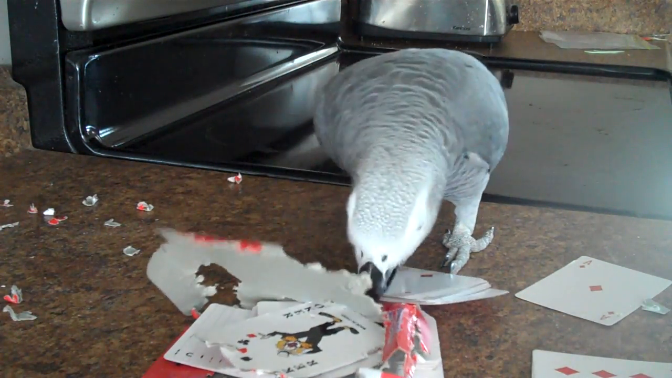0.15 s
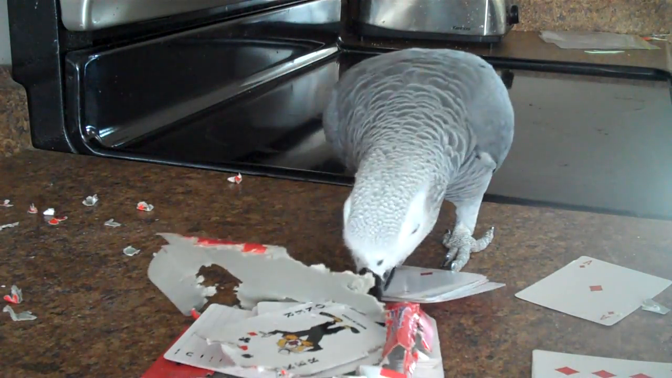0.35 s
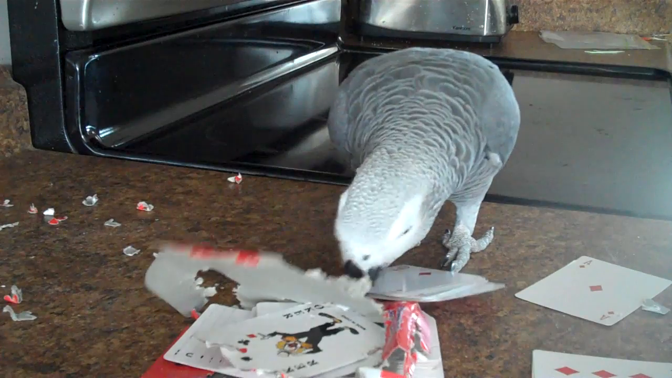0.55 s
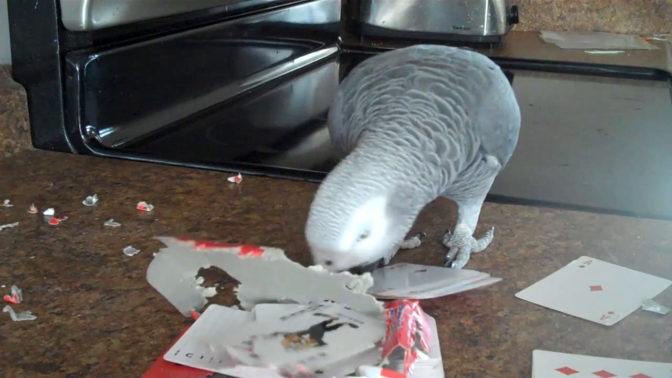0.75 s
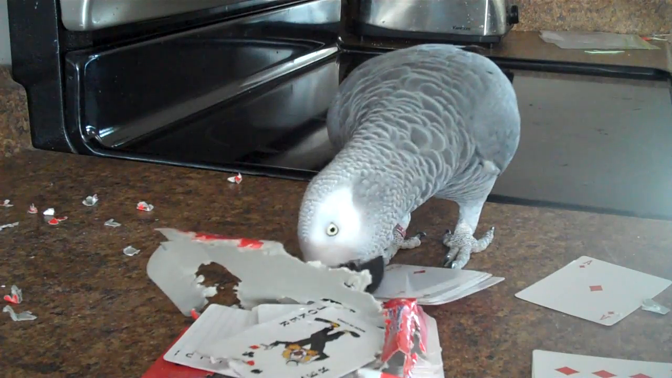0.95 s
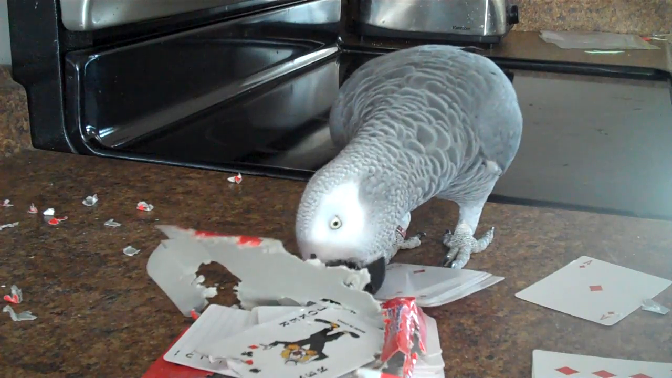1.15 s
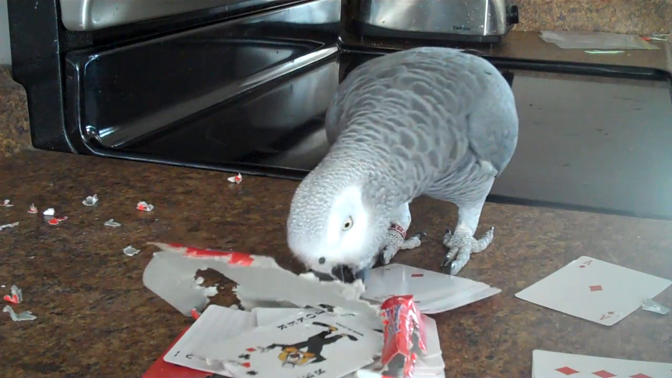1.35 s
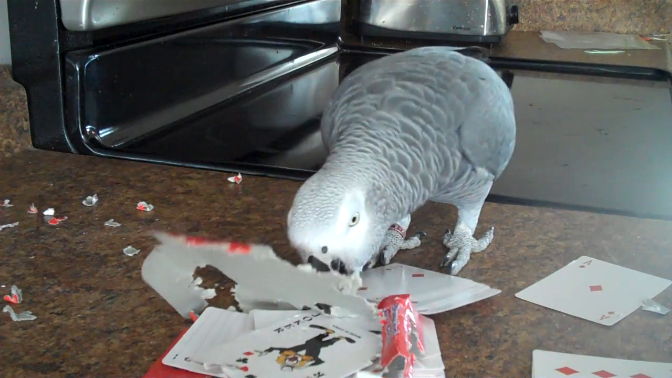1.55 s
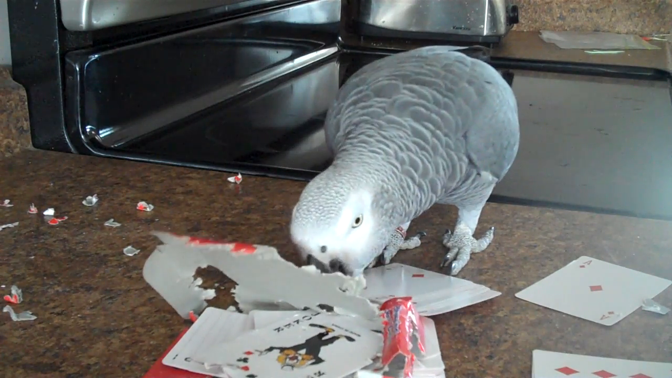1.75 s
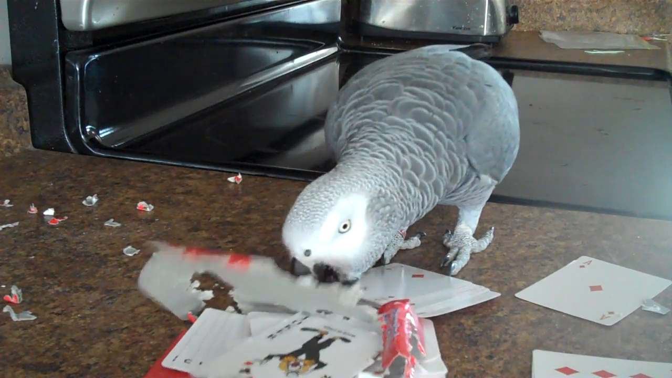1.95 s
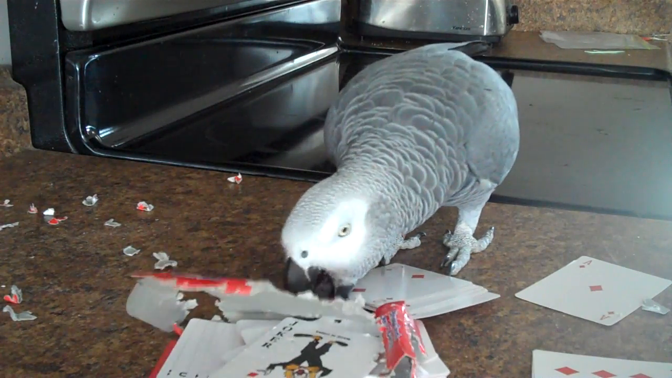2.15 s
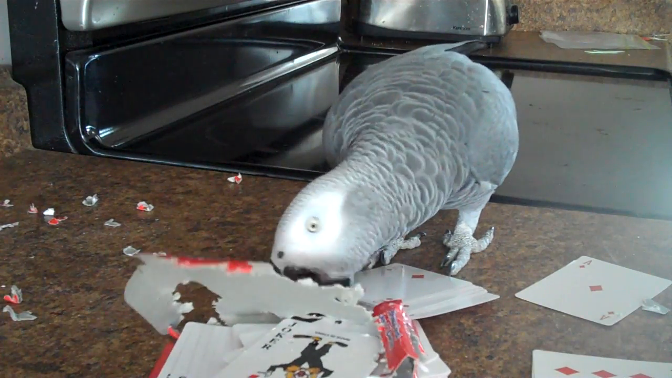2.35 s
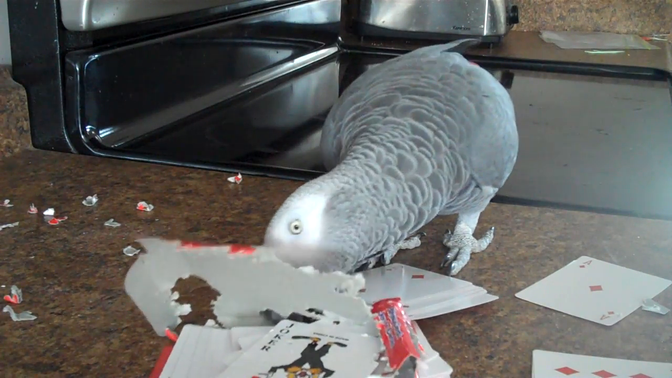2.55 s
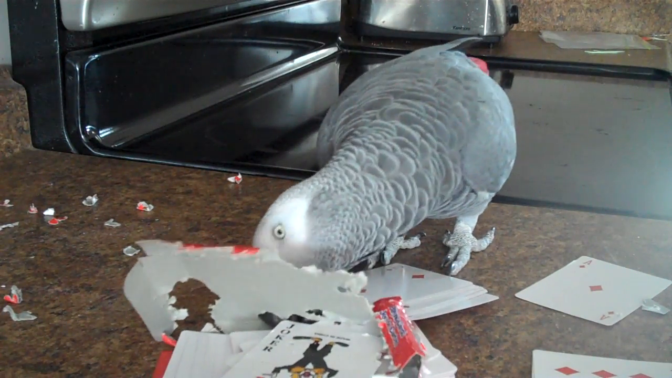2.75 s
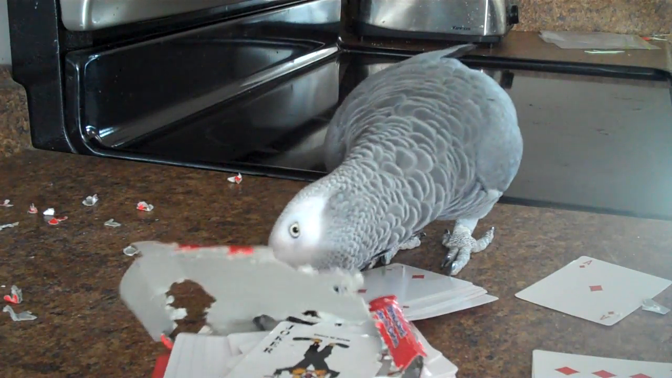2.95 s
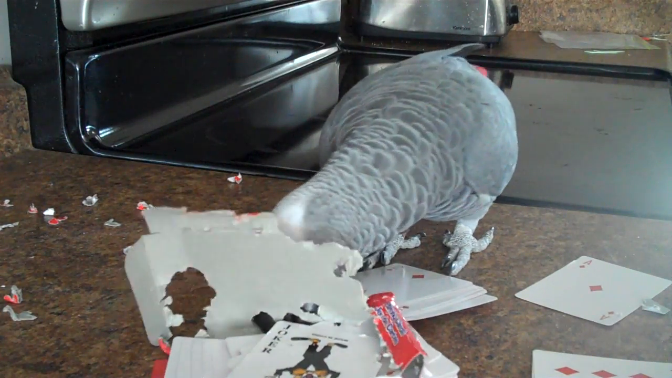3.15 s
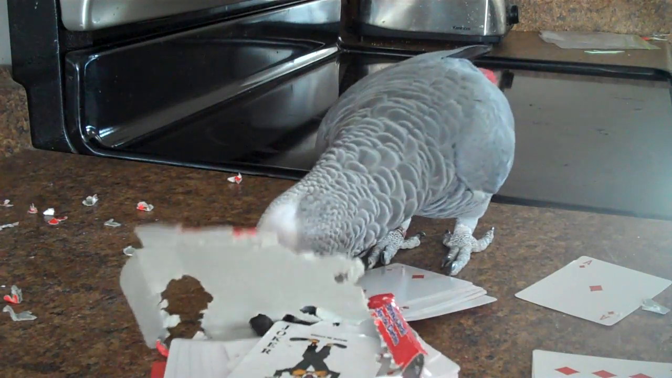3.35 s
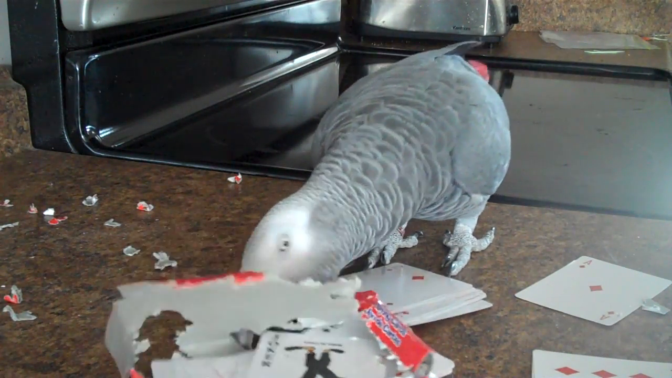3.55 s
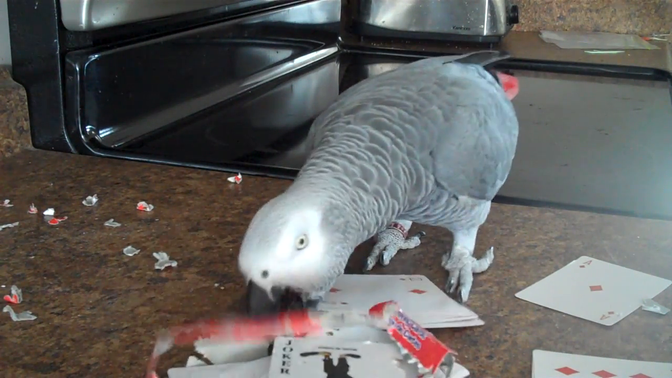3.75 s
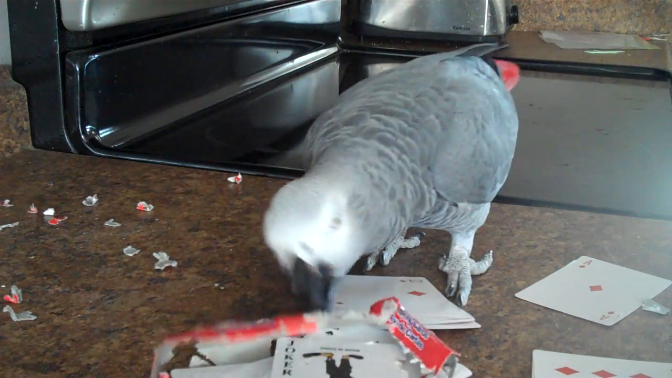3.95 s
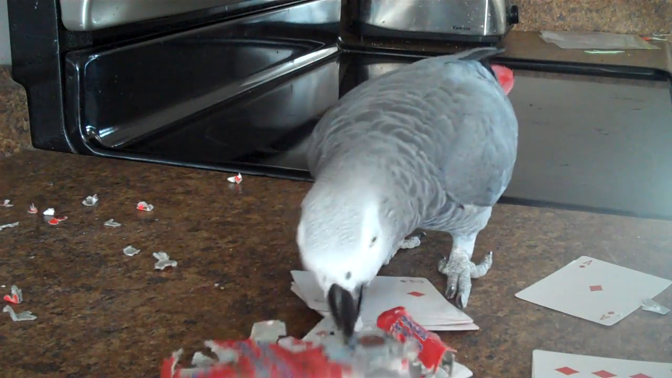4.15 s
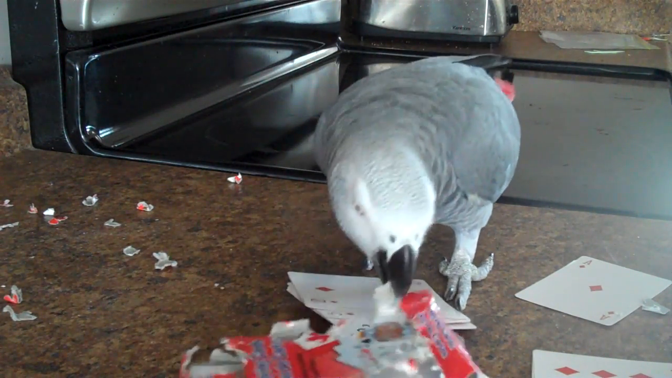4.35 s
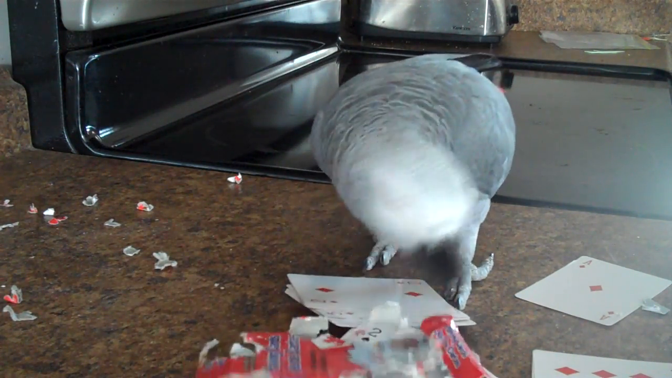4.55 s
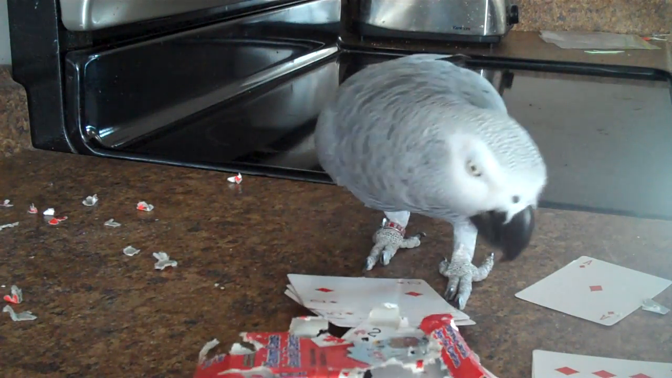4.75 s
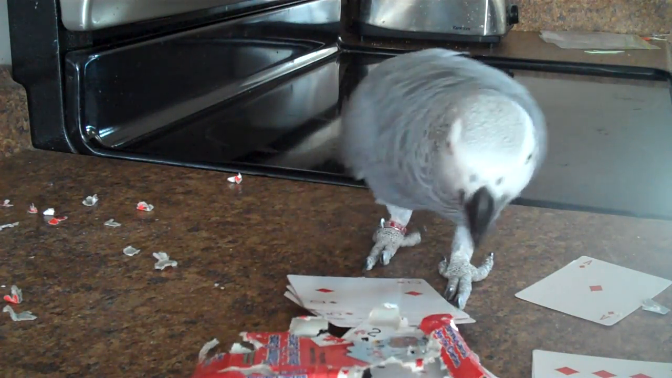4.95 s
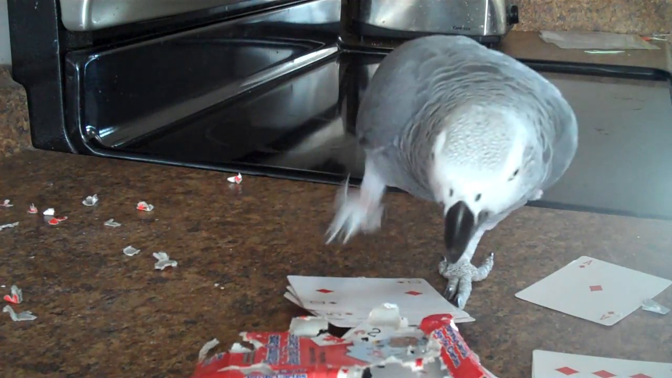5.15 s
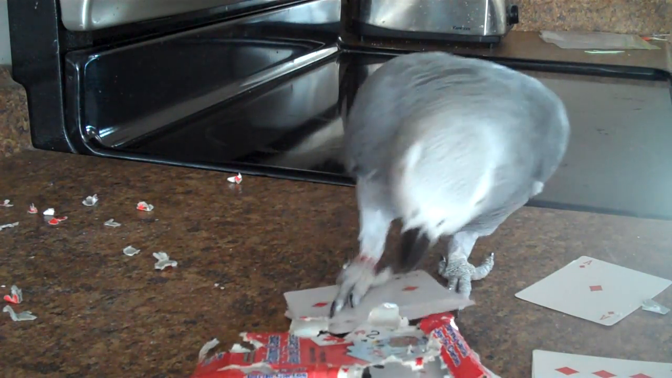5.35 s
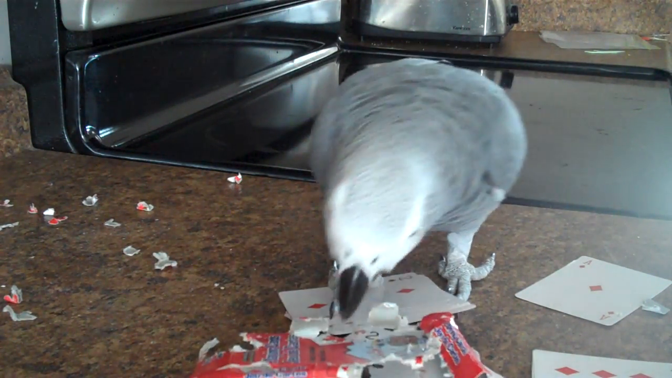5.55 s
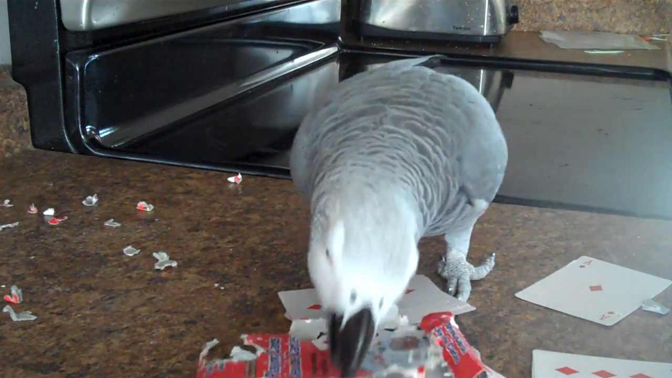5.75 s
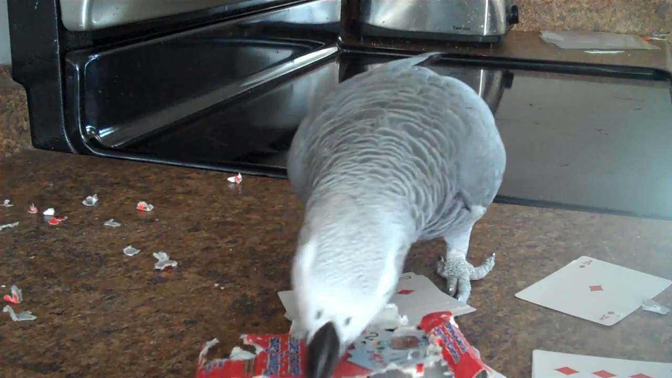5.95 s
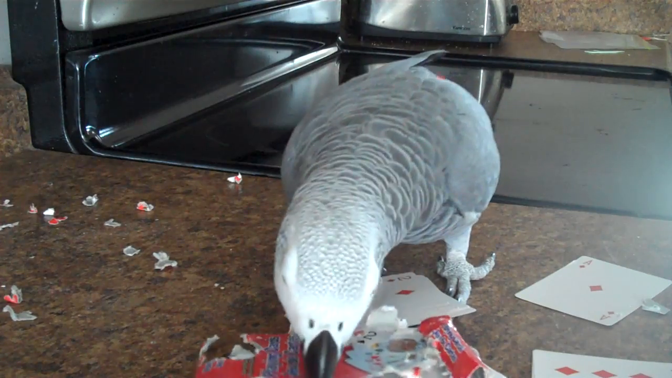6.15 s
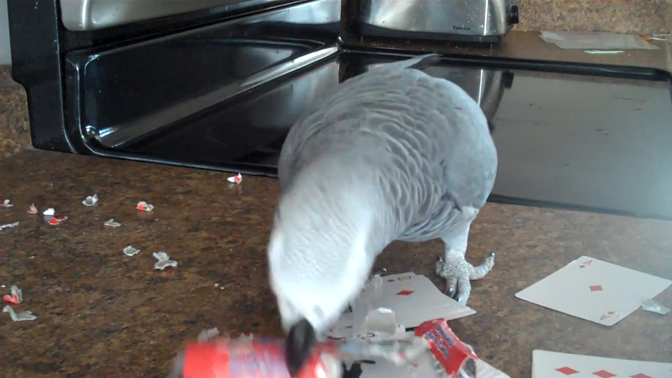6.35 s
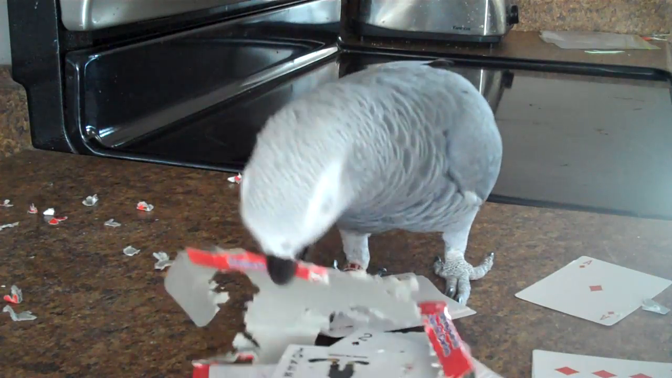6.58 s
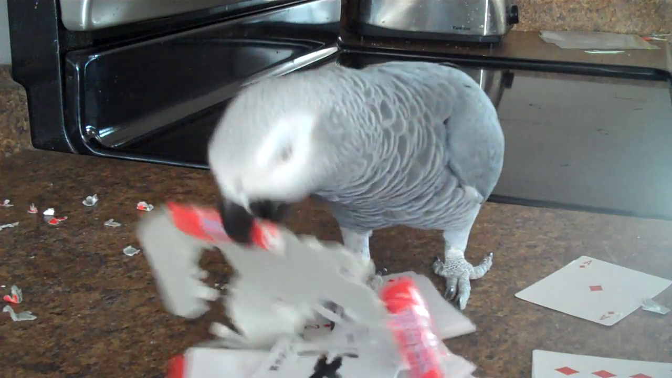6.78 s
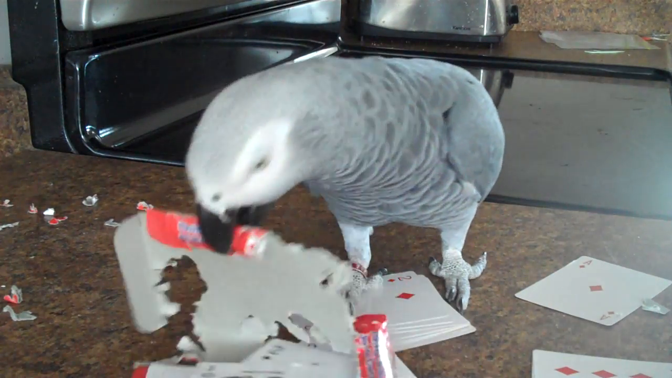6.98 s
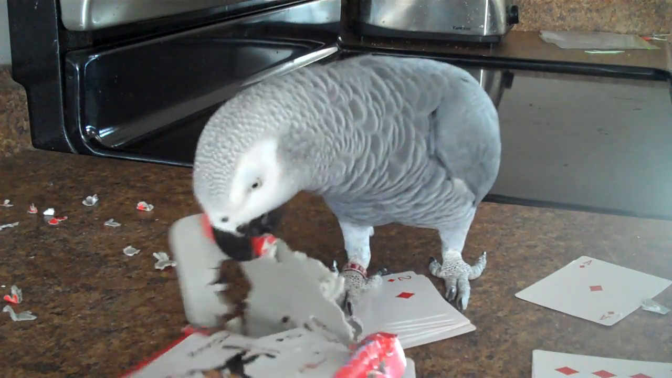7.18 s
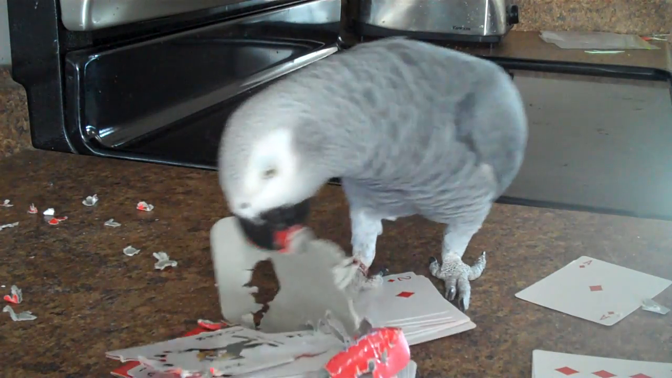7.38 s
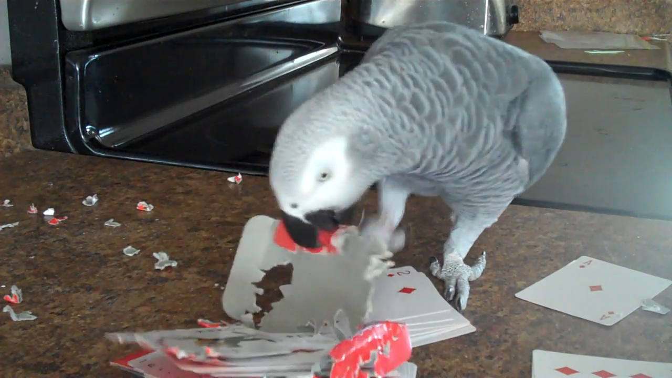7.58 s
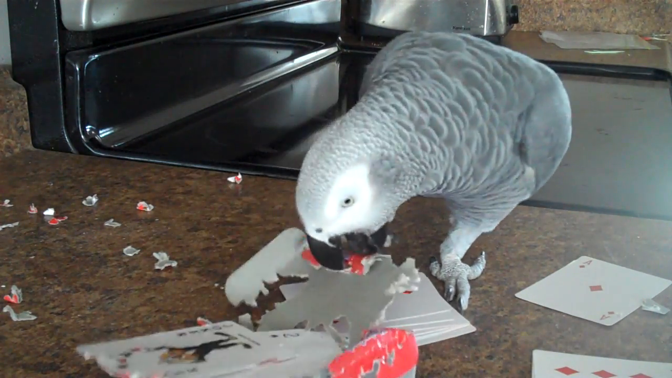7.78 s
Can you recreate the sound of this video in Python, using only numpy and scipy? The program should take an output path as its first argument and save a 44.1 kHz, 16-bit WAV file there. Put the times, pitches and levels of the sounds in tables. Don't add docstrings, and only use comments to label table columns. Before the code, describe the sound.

A low, faint refrigerator hum with airy hiss runs throughout a small kitchen with very little echo. Close to a small stereo microphone, a parrot works on a thin card box. From 0.1 to 1.3 seconds there are dry cracks, small knocks and light scraping, then a softer rustle. Around 2 to 3 seconds short bright rips and snaps come in separate bursts. From 3.4 to 4.6 the tearing grows denser, with a brief chirp at 3.6, a cluster of cracks, a hard pick at 4.2 and a thin wavering squeak near 4.4. It is nearly quiet around 4.7 to 5, then isolated ticks, crunches and a tiny rising squeak before 5.7. From 6.2 it builds again; a sharp pick at 6.65 precedes a loud flat slap at 6.8 with rattling and a short low puff. Crackling rips peak until 7.3, then thin into rustle and a few last crunches.

```python
import sys
import numpy as np
from scipy import signal
from scipy.fft import rfft, irfft, next_fast_len
from scipy.io import wavfile
from scipy.ndimage import uniform_filter1d

SR = 44100
rng = np.random.default_rng(int(sys.argv[2]) if len(sys.argv) > 2 else 0)


def natural_amplitude(level_db):
    exponent = np.asarray(level_db, float) / 20
    return 10 ** exponent


def wrap_up_sound(samples):
    columns = np.atleast_2d(samples).T
    tamed = np.clip(columns, -1, 1)
    steps = np.round(tamed * 32767).astype(np.int16)
    wavfile.write(sys.argv[1], SR, steps)


N = 344862


def evened(x):
    return x / np.sqrt(np.mean(x ** 2) + 1e-20)


def read(points, hz):
    f, value = np.transpose(points)
    return np.interp(np.log(hz + 1), np.log(f + 1), value)


def colour(points):
    half = np.log(natural_amplitude(np.maximum(read(points, np.fft.rfftfreq(2048, 1 / SR)), -80)))
    full = np.concatenate([half, half[-2:0:-1]])
    taps = np.fft.ifft(np.exp(np.conj(signal.hilbert(full)))).real[:1024]
    return taps / np.linalg.norm(taps)


def coloured(x, points):
    return signal.oaconvolve(x, colour(points)[None])[:, :x.shape[1]]


def resonate(x, hz, width):
    turn = np.exp(2j * np.pi * np.cumsum(hz * np.ones(x.shape[-1])) / SR)
    r = np.exp(-np.pi * width / SR)
    return 2 * (turn * signal.lfilter([1 - r], [1, -r], x / turn)).real


def add(mix, s, sound):
    part = mix[:, round(s * SR):][:, :sound.shape[1]]
    part += sound[:, :part.shape[1]]


def ports(streams, same, lean, lead):
    size = next_fast_len(N)
    hz = np.fft.rfftfreq(size, 1 / SR)
    first, second = rfft(streams, size)
    likeness = np.clip(read(same, hz), 0, 1)
    right_gain = natural_amplitude(-read(lean, hz))
    turn = np.exp(-1j * read(lead, hz))
    unlike = 1 - likeness ** 2
    middle = np.sqrt(abs(1 + right_gain * likeness * turn) ** 2 + right_gain ** 2 * unlike) / 2
    right = right_gain * (likeness * turn * first + np.sqrt(unlike) * second)
    return irfft(np.array([first, right]) / middle, size)[:, :N]


# frequency [Hz], level [dB per Hz].
ROOM_AIR = [(24, -20), (40, 0.5), (69, -8.5), (163, -8), (259, -3.5), (340, 0.5), (529, -9), (729, -7.5),
            (1640, -13.5), (4390, -20), (7540, -23), (9410, -23), (14300, -25)]
# frequency [Hz], level [dB], width of its wavering [Hz].
MOTOR_LINES = [(59.5, -72, 1.5), (119.9, -73, 2.5), (213, -78, 3), (238, -79, 3), (297, -77, 3),
               (318.1, -63, 2.2), (370, -77, 3), (397, -77, 3), (427.5, -73, 6.0)]
# frequency [Hz], likeness [0 to 1].
AIR_SAME = [(60, 0.24), (130, 0.22), (290, 0.99), (640, 0.48), (1400, 0.37), (3090, 0.051), (6790, 0.07),
            (14900, 0.02)]
# frequency [Hz], left-right difference [dB].
AIR_LEAN = [(60, 3.1), (180, 3.1), (550, 4.4), (1640, 5.1), (4950, 3.2), (14900, 1.1)]


def refrigerator():
    size = next_fast_len(N)
    hz = np.fft.rfftfreq(size, 1 / SR)
    response = natural_amplitude(read(ROOM_AIR, hz)) * np.minimum(hz / 70, 1) ** 2
    air = irfft(rfft(rng.standard_normal((2, size))) * response, size)
    out = natural_amplitude(-58) * evened(air[:, :N])
    t = np.arange(N) / SR
    for line_hz, db, width in MOTOR_LINES:
        waver = 0.05 * evened(resonate(rng.standard_normal(N), line_hz, width))
        out += natural_amplitude(db) * (np.sin(2 * np.pi * line_hz * t) + waver)
    return ports(out, AIR_SAME, AIR_LEAN, lead=[(1, 0), (2, 0.02)])


def clumps(clump_s):
    return evened(uniform_filter1d(uniform_filter1d(rng.standard_normal(N), round(clump_s * SR)), 40))


def slips(per_s, spread_db, swell_db):
    size = natural_amplitude(spread_db * np.minimum(rng.exponential(1, N), 5) + swell_db)
    happens = rng.random(N) < per_s / SR
    return evened(size * happens * rng.standard_normal((2, N)))


def strokes(rows, follows):
    t = np.arange(0, N / SR + 0.01, 0.001)
    s, db, swell, fade = np.transpose(rows)[:, :, None]
    away = np.where(t < s, (s - t) / np.maximum(swell, 0.003), (t - s) / np.maximum(fade, 0.003))
    peak_db = follows * (db + 55) - 55
    power = natural_amplitude(peak_db - 10.5 * away ** 1.42) ** 2
    return np.interp(np.arange(N) / SR, t, power.sum(0))


# frequency
# [Hz], level [dB per Hz].
FIZZ = [(2060, -29), (3500, -13.5), (5640, -4.5), (6250, 0), (6950, -1), (7750, 0.5), (9910, -16),
        (14000, -23), (14900, -78), (15400, -96)]
# frequency [Hz], level [dB per Hz].
BODY = [(290, -53), (500, -13), (874, -8), (1120, -9), (1240, -8.5), (1510, -12.5), (1780, -5.5), (3710, 0),
        (5000, -9.5), (6500, -21.5), (11000, -120)]
PATCH_HZ = [300, 1400, 2600, 4200, 5800, 7000, 8600, 15500]
# peak time [s], fizz level [dB], swell [s], fade [s].
TEARS = [(0.4, -59.5, .02, 0.067), (0.513, -53.5, 0.053, 0.18), (0.73, -54.5, 0.15, 0.32),
         (0.845, -49, 0.033, 0.0093), (1.469, -55.5, 0.18, 0.091), (1.65, -63, 0.1, .14),
         (1.802, -55, 0.013, 0.094), (2.077, -40, 0.073, 0.042), (2.588, -48, 0.088, 0.096),
         (2.7, -49, 0.12, .035), (2.796, -51, .02, 0.15), (3.005, -43, 0.017, 0.069),
         (3.075, -44, 0.035, 0.076), (3.396, -43, .006, 0.044), (3.448, -40.5, 0.045, 0.071),
         (3.698, -36.5, 0.11, 0.097), (4.035, -49, 0.03, 0.02), (4.071, -49.5, 0.026, 0.18),
         (4.358, -43.5, 0.056, 0.13), (4.5, -46, 0.088, 0.079), (4.568, -45, 0.058, 0.03),
         (4.93, -63.5, 0.014, 0.42), (6.53, -44, 0.11, 0.2), (6.68, -47.5, .1, 0.25),
         (6.854, -38.5, 0.04, 0.098), (7.0, -45, 0.25, 0.18), (7.134, -49, 0.14, 0.14),
         (7.25, -38.5, 0.19, 0.085), (0.135, -56, .012, .005), (0.245, -56, .006, 0.036),
         (3.487, -44, 0.013, 0.013), (3.79, -52, 0.014, 0.018), (4.47, -45, .008, .008),
         (4.515, -45, .015, .015), (6.545, -49, 0.015, .03), (6.93, -48, .015, .015),
         (7.185, -36.5, 0.019, .012), (7.205, -42, .012, 0.021), (7.33, -43, .015, 0.0091),
         (7.4, -54, 0.04, 0.21), (7.56, -53, 0.062, 0.16)]
# peak time [s], fizz level [dB], swell [s], fade [s].
CHEWS = [(0.162, -57.5, 0.093, 0.087), (0.287, -60, 0.076, 0.05), (0.93, -55, 0.04, 0.099),
         (1.05, -56.5, 0.026, .03), (1.14, -56.5, 0.019, 0.12), (1.253, -56.5, 0.1, 0.043),
         (1.908, -48.5, 0.013, 0.037), (2.239, -57, 0.076, 0.038), (2.361, -46.5, 0.045, 0.077),
         (2.931, -49, 0.015, 0.075), (3.25, -55.5, 0.18, 0.17), (3.57, -47.5, 0.055, 0.063),
         (3.84, -51.5, 0.078, 0.096), (3.89, -46, 0.055, 0.053), (3.925, -43, 0.019, 0.012),
         (4.198, -48, 0.019, 0.079), (4.4, -49, .06, .05), (4.51, -48, .04, .04), (4.63, -62.5, .03, 0.093),
         (5.078, -61.5, 0.082, 0.041), (5.314, -62, 0.025, 0.088), (5.42, -52.5, 0.062, 0.049),
         (5.687, -56.5, 0.02, 0.026), (5.751, -51, 0.01, .02), (5.813, -51, 0.014, 0.035),
         (5.9, -65, 0.066, 0.24), (6.09, -55, 0.011, 0.029), (6.204, -51, 0.06, 0.084),
         (6.36, -55, 0.11, 0.087), (6.822, -39, 0.032, 0.03), (7.732, -51.5, 0.11, 0.073)]


def rubbing():
    at_rest = natural_amplitude(-69)
    fizz_gain = np.sqrt(strokes([*TEARS, *CHEWS], 0.94) + at_rest ** 2)
    tear_body = natural_amplitude(-6.5) * np.sqrt(strokes(TEARS, 0.91))
    chew_body = natural_amplitude(-3) * np.sqrt(strokes(CHEWS, 0.91))
    body_gain = np.hypot(tear_body, chew_body)

    shared, drive = clumps(0.0173), 0
    for low, high in zip(PATCH_HZ, PATCH_HZ[1:]):
        swell_db = 1.1 * shared + 2.2 * clumps(0.005) + 0.9 * clumps(0.05)
        patch = slips(4500, spread_db=2.2, swell_db=swell_db)
        band = signal.butter(2, [low, high], "bandpass", fs=SR, output="sos")
        drive = drive + signal.sosfilt(band, patch)
    loose_ticks = slips(300, spread_db=2.6, swell_db=2 * shared)
    drive = evened(drive) + natural_amplitude(-13) * loose_ticks
    return evened(coloured(drive, FIZZ)) * fizz_gain + evened(coloured(drive, BODY)) * body_gain


# start [s], peak level [dB], t60 [ms].
CRACKS = [(0.1577, -27.5, 4), (0.645, -37.5, 6.5), (0.788, -34, 6), (0.9159, -34.5, 7), (0.9198, -28.5, 3),
          (2.4, -25, 3.5), (2.591, -33, 8), (2.994, -23, 5.5), (3.283, -39, 14), (3.6764, -36, 9),
          (3.7079, -30, 8), (3.917, -25.5, 8.2), (3.944, -33.5, 8.8), (4.0182, -41, 10), (4.067, -34, 2.7),
          (4.2163, -31, 13), (4.3138, -32.5, 12), (4.4008, -27, 2.4), (5.8035, -28, 4), (5.888, -38, 4.97),
          (6.152, -43.5, 4), (6.2613, -31, 7), (6.378, -33.5, 15), (6.5825, -32, 5.8), (6.6086, -28, 3.7),
          (7.099, -26.5, 4.3), (7.4566, -32, 11), (7.5545, -37, 29), (7.5616, -32.5, 6.9),
          (0.2053, -38, 5.6), (0.728, -36, 6), (0.828, -36, 4), (1.783, -43.5, 5), (2.219, -39, 6),
          (2.356, -36, 3.6), (2.703, -38, 5), (2.72, -38, 4), (2.866, -39, 4), (3.652, -31, 5),
          (3.69, -30, 5), (3.702, -24, 5), (3.851, -38, 2.7), (3.925, -33, 7.9), (4.064, -35, 4.8),
          (4.565, -28.5, 2.3), (4.581, -30, 7.7), (6.366, -38, 5), (6.528, -36, 9), (6.463, -34, 8),
          (6.945, -29, 6), (3.73, -28, 5), (3.744, -27, 6), (3.757, -31, 4), (6.693, -33, 5),
          (7.063, -31, 9.1), (7.163, -28, 6), (7.185, -27, 8), (7.237, -27, 6), (7.285, -27.5, 6)]
# start [s], peak level [dB], knock relative [dB], knock [Hz].
TICKS = [(0.684, -36, -10, 4260), (0.712, -39, -2, 3850), (0.8712, -35.5, 6, 4600),
         (1.8656, -37, 1.5, 3830), (2.0032, -45, 8, 3830), (2.056, -33, -1, 4310), (2.341, -37, 1, 3770),
         (2.556, -38, 6, 3770), (2.9216, -43, 8, 3800), (3.2375, -46, 8, 3900), (3.32, -40, -1, 4100),
         (3.6268, -29, -6, 4700), (3.7253, -25, -12, 3900), (4.1011, -38, -4, 4310), (4.113, -35, -6, 4260),
         (4.567, -30, -8, 4460), (5.6856, -40, 3, 5300), (5.354, -43, 0, 3300), (5.52, -47.5, -6, 4000),
         (5.7567, -38.5, -1, 4780), (6.1989, -33.5, -4, 4630), (6.2928, -36, 0, 4400),
         (6.3514, -47, 2, 3880), (6.625, -29, -3, 4500), (6.7475, -32, -2, 3600), (6.835, -22.5, 3.5, 3600),
         (7.0471, -32, -3, 4780), (7.663, -28, -3, 4070), (2.374, -38, -3, 3500), (3.175, -40, 2, 4200),
         (3.559, -44, 6, 4800), (3.869, -43, 11, 4400), (5.328, -50, 4, 3300), (6.505, -34.5, -5, 5000)]
# start [s], peak level [dB], knock relative [dB], knock [Hz].
KNOCKS = [(0.1358, -36.5, -8, 1010), (0.1915, -33, -7, 1850), (0.2814, -44, 12, 1900),
          (0.283, -54, 12, 950), (2.93, -29.5, -4.5, 1740), (3.2089, -36, -16, 1210), (3.931, -41, 4, 1300),
          (3.931, -40, 5.5, 2100), (4.071, -33.5, -7, 2200), (4.251, -33, -20, 2780),
          (4.581, -39, -1, 2200), (5.3071, -44, 10, 2440), (5.818, -41, -7, 3320),
          (6.0834, -39.5, 2.5, 2800), (6.4003, -37.5, -11, 1660), (6.78, -45.5, 8.5, 2300),
          (6.797, -48, 9, 1500), (6.7335, -44.5, 5, 1400), (6.625, -46, 7, 1250), (3.691, -38, 6, 2600),
          (5.807, -49, 6, 1200), (2.6, -50, 7, 2200), (2.803, -48, 6, 2100), (5.902, -53, 6, 2800),
          (5.07, -49, 5, 3100), (6.292, -41.5, 6, 2460), (4.456, -46, 7, 2600), (3.769, -38, 3, 2400),
          (6.441, -39, 1.5, 3000), (7.43, -43.5, 0, 2900)]
# start [s], peak level [dB], knock relative [dB], knock [Hz].
CRUNCHES = [(0.508, -36.5, -17, 2350), (0.7376, -40, -3.5, 2000), (0.9248, -38, -5, 3640),
            (1.2444, -40.5, -8, 2120), (1.9136, -37.5, -5, 2910), (2.787, -50.5, 8, 1800),
            (3.075, -50, 12.5, 1880), (3.4455, -31, -11, 3060), (3.5178, -49, 10.5, 1580),
            (3.821, -37.5, -2, 1120), (4.1885, -29.5, -19, 2970), (4.359, -29, -2, 4080),
            (4.3943, -38, 6.5, 4410), (4.922, -46, -15, 900), (5.086, -41.5, -4, 3200),
            (5.313, -34, -22, 4050), (5.422, -39.5, -13, 3580), (5.7437, -39.5, -1.5, 1800),
            (6.2097, -38.5, -4, 2830), (6.6015, -34, -3, 4590), (7, -37.5, 9.5, 4840),
            (7.2951, -30, -5, 2150), (7.734, -36.5, -1.5, 3500), (7.77, -35.5, -11, 4780)]
# start [s], peak level [dB], knock relative [dB], knock [Hz].
PICKS = [(0.1525, -34, -1, 2000), (0.1688, -33, -10, 3000), (0.175, -35, -8, 3000), (0.2815, -50, 5, 4200),
         (2.595, -46, 6, 1900), (2.8, -48, 8, 1400), (2.995, -42, 6, 2000), (3.6955, -26, -8, 4500),
         (3.849, -33, -6, 4450), (3.926, -31, -12, 5000), (4.197, -22, 3.5, 3900), (4.3575, -30, 0, 4340),
         (4.469, -32, -10, 5000), (5.3065, -25, -1, 4600), (5.3095, -33, -3, 4500), (5.365, -51, 9, 2100),
         (5.397, -43, -4, 3000), (5.408, -40, -3, 2500), (6.6567, -19, -6, 4500), (6.8145, -20, -4, 2400),
         (6.8242, -24, -2, 2500), (6.828, -27, 3, 2600), (6.8305, -25, -8, 4500), (6.8415, -24, -6, 2000),
         (6.847, -27, -6, 3000), (6.855, -33, 3, 2500), (6.869, -29, -6, 1800), (6.8733, -25, 2, 5600),
         (6.8736, -36, 6, 2000), (4.1865, -29, -2, 6800), (6.8933, -24, -10, 2400), (7.146, -31, -12, 5000),
         (7.182, -26, -12, 5000), (7.189, -40, 10, 1950), (7.221, -30, -12, 5000), (7.2465, -28, -10, 5000),
         (7.258, -28, -10, 5000)]


def snap_rows():
    rows = [(s, db, -17.5, 3900, 0.88, ms / 1000) for s, db, ms in CRACKS]
    for kind, rise_ms, t60 in [(TICKS, 0.67, 0.0074), (KNOCKS, 0.65, 0.011),
                               (CRUNCHES, 1.74, 0.033), (PICKS, 0.2, 0.0065)]:
        rows += [(*row, rise_ms, t60) for row in kind]
    return rows


def snaps():
    out, t = np.zeros((2, N)), np.arange(-300, 1800) / SR
    for s, db, knock_db, hz, rise_ms, t60 in snap_rows():
        rise = natural_amplitude(6 * t * 1000 / max(rise_ms, 0.05))
        rustle = 0.08 * natural_amplitude(-60 * t / 0.03)
        fall = natural_amplitude(-60 * t / np.clip(t60, 0.002, 0.2)) + rustle
        burst = rng.standard_normal((2, len(t))) * np.where(t < 0, rise, np.minimum(fall, 1))
        blow = (t == 0) * min(0.035 / t60, 4.5)
        strike = 0.83 * burst - 1.06 * blow
        burst = burst - 0.43 * blow

        sharp_edge = 0.039 * np.gradient(burst, axis=1)
        crack = coloured(burst, FIZZ) + sharp_edge
        modes = resonate(strike, hz, 0.39 * hz) + 0.3 * resonate(strike, 1.9 * hz, 0.38 * hz)
        knock = evened(resonate(modes, hz, 1.16 * hz))
        whole_panel = 0.2 * min(1800 / hz, 1) ** 2
        knock = knock + whole_panel * evened(coloured(burst, BODY))
        snap = crack / abs(crack[0]).max() + natural_amplitude(knock_db) * knock / abs(knock[0]).max()
        add(out, s + t[0], natural_amplitude(db) * snap)
    no_bass = signal.butter(3, 700, "highpass", fs=SR, output="sos")
    return signal.sosfilt(no_bass, out)


# time [s], level [dB], pitch [Hz].
SQUEAKS = [
    [(4.32, -53, 3430), (4.355, -46, 3400), (4.375, -61, 3400), (4.393, -47, 3300), (4.417, -50, 3400),
     (4.44, -53, 3350), (4.486, -53, 3270), (4.518, -47, 3300), (4.57, -73, 3400)],
    [(5.66, -70, 5200), (5.672, -52, 5200), (5.684, -46, 5300), (5.697, -50, 5600), (5.705, -66, 5600)],
    [(3.623, -60, 4900), (3.627, -32, 4800), (3.632, -58, 4600)],
]


def squeaks():
    out = np.zeros((2, N))
    drive = slips(4000, spread_db=1.8, swell_db=1.8 * clumps(0.01))
    for rows, width in zip(SQUEAKS, [540, 900, 600]):
        s, db, hz = np.transpose(rows)
        t = np.arange(s[0], s[-1], 1 / SR)
        pitch = np.interp(t, s, hz)
        tone = drive[:, round(s[0] * SR):][:, :len(t)]
        tone = resonate(resonate(tone, pitch, width), pitch, 2 * width)
        gain = natural_amplitude(np.interp(t, s, db) + 1.2) * signal.windows.tukey(len(t), 0.2)
        add(out, s[0], gain * evened(tone))
    return out


# frequency [Hz], level [dB per Hz].
SLAP = [(300, -18), (800, -12), (1700, 1.5), (3700, -5), (5540, -11.5), (7450, -4.5), (11800, -27),
        (14500, -21.5)]
# start [s], level [dB], air cushion pitch [Hz], t60 [s].
PUFFS = [
    (6.823, -36, 247, 0.064),
    (6.83, -39, 420, 0.04),
    (6.82, -37.5, 600, 0.025),
    (6.822, -50, 105, 0.14),
]


def drop():
    out, t = np.zeros((2, N)), np.arange(8000) / SR
    fall = natural_amplitude(-60 * t / 0.0095) + 0.265 * natural_amplitude(-60 * t / 0.061)
    rattle = 0.08 * rng.standard_normal((2, len(t))) * fall
    blow = t == 0
    slap = signal.fftconvolve(rattle - blow, colour(SLAP)[None])
    add(out, 6.8194, natural_amplitude(-5) * slap / abs(slap[0]).max())
    for s, db, hz, t60 in PUFFS:
        push = rng.standard_normal((2, len(t))) * natural_amplitude(-60 * t / t60) * (1 - np.exp(-t / 0.004))
        puff = resonate(resonate(push, hz, 0.82 * hz), hz, 0.82 * hz)
        add(out, s, natural_amplitude(db + 5) * puff / abs(puff[0]).max())
    return signal.sosfilt(signal.butter(2, 75, "highpass", fs=SR, output="sos"), out)


# frequency [Hz], t60 [s].
KITCHEN = [(300, 0.15), (2000, 0.066), (8000, 0.03), (15000, 0.17)]


def kitchen(x):
    hz, t, z = signal.stft(rng.standard_normal((2, SR // 2)), SR, nperseg=256)
    fall = natural_amplitude(-60 * t / read(KITCHEN, hz)[:, None])
    tail = signal.istft(z * fall, SR, nperseg=256)[1]
    tail = np.pad(tail, ((0, 0), (150, 0)))
    return signal.fftconvolve(x, tail / np.linalg.norm(tail[0]), axes=1)[:, :N]


# frequency [Hz], likeness [0 to 1].
CARD_SAME = [(200, .97), (1700, .9), (2800, .97), (4800, .65), (6000, .62), (6900, .45), (8000, .6),
             (11500, .3)]
# frequency [Hz], left-right difference [dB].
CARD_LEAN = [(300, 3.4), (3000, 1.6), (4800, 1.5), (5900, -2), (6900, 3.5), (7900, 16), (9200, 11.5),
             (14500, 21)]
# frequency [Hz], lead [radians].
CARD_LEAD = [(300, 0), (5000, -.2), (6000, -.2), (6900, 1.2), (7900, 0), (10000, -1.1), (14000, -1.3)]


def scene():
    card = rubbing() + snaps() + squeaks() + drop()
    card = card + natural_amplitude(-7.5) * kitchen(card)
    return ports(card, CARD_SAME, CARD_LEAN, CARD_LEAD) + refrigerator()


# time [s], peak level [dB].
TIPS = [(0.156, -60), (2.3979, -70), (2.9292, -64), (2.9934, -81), (3.2081, -79), (3.6257, -56),
        (5.3058, -67), (5.6835, -86), (5.7433, -85), (5.8017, -54), (5.8174, -74), (5.886, -76),
        (6.0821, -75), (6.5819, -77), (6.6553, -58), (6.8179, -49), (7.661, -68)]


def tips(edge):
    half_s = 0.0016
    t, opened = np.linspace(-3, 3, round(6 * half_s * SR)), np.zeros((1, N))
    for s, db in TIPS:
        add(opened, s - half_s, natural_amplitude(db + 1) * np.exp(-t ** 2)[None])
    thinning = signal.butter(12, 14800, fs=SR, output="sos")
    hiss = signal.sosfilt(thinning, rng.standard_normal(N))
    top = evened(hiss - signal.oaconvolve(hiss, edge, "same"))
    return opened * top * [[1], [0.1]]


def roll_off(x):
    return signal.sosfilt(signal.butter(12, 16700, fs=SR, output="sos"), x)


def record(dry):
    edge = signal.firwin(1023, 14330, window=("kaiser", 9), fs=SR)
    limited = signal.oaconvolve(dry, edge[None], "same")
    return roll_off(limited + tips(edge))


dry = scene()
out = record(dry)
wrap_up_sound(out)
```